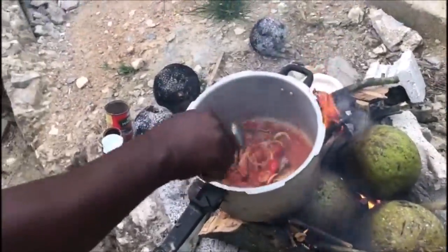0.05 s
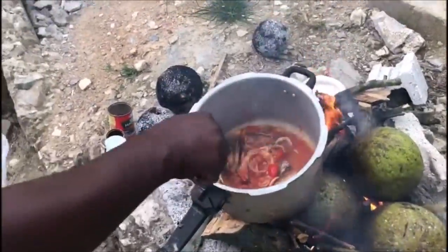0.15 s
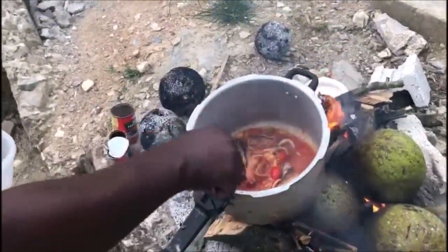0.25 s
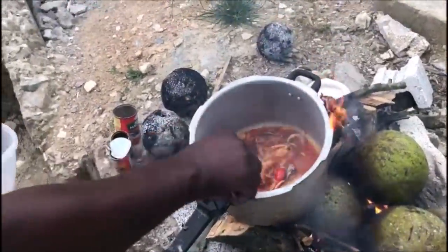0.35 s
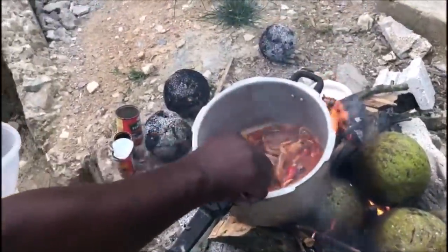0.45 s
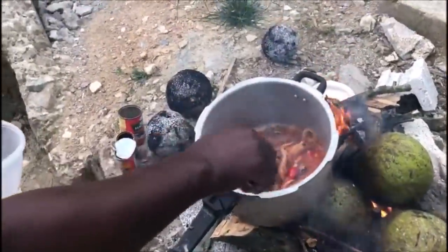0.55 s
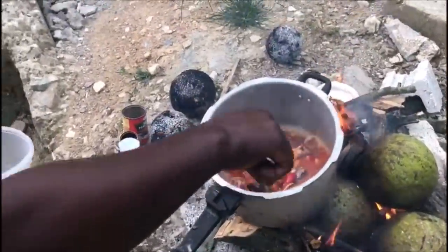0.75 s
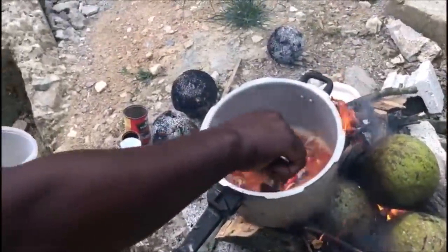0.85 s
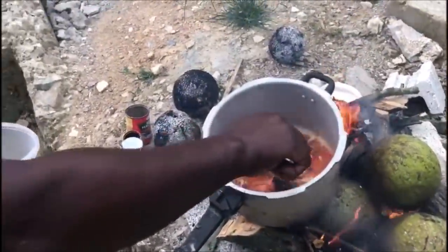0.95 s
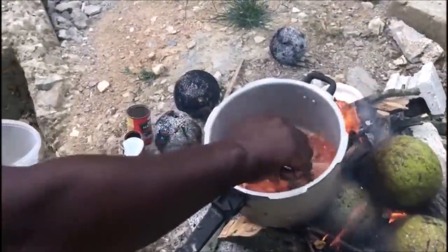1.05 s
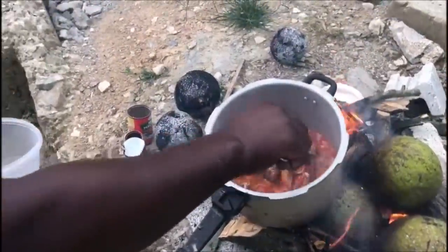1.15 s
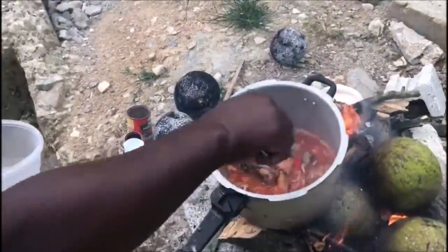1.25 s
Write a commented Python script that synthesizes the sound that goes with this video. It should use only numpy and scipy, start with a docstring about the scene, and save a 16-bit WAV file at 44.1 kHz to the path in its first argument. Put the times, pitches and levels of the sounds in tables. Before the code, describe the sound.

Close above an open pot outdoors, bubbling sauce fries with crisp, uneven hiss and tiny spitting ticks; one bright metallic spoon click comes early, a swell of sizzle follows, then a softer, duller knock.

```python
"""Tomato sauce sizzles in a deep metal pot over an outdoor wood fire while a spoon stirs it.
Random bubble bursts over hiss make the sizzle, and narrow noise bands make the air in the pot ring.
Larger drops spit with short ringing ticks. The spoon gives one sharp click on the wall and later a
duller knock through the sauce: decaying ringing tones plus a crack of noise.
The fire rumbles faintly below, as bass-heavy noise."""
import sys
import numpy as np
from scipy import signal
from scipy.fft import rfft, irfft
from scipy.io import wavfile

SR = 44100
rng = np.random.default_rng(int(sys.argv[2]) if len(sys.argv) > 2 else 0)


def unload_wav(signal):
    """Save mono or channel-first audio to the path in sys.argv[1] as 16-bit WAV at rate SR, clipped to [-1, 1]."""
    wavfile.write(
        sys.argv[1],
        SR,
        np.round(np.clip(np.atleast_2d(signal).T, -1, 1) * 32767).astype(np.int16),
    )


N = 57330
TIME = np.arange(N) / SR

# tones of the pot's bare wall: pitch_hz, level_db (used only for the spoon click), t60_s (time to fade 60 dB)
WALL_MODES = [(1026, -27, .05), (1465, -29, .055), (2140, -28, .03), (2833, -28, .06), (2973, -30, .09),
              (3336, -14, .045), (3574, -16, .028), (4005, -15, .022), (4500, -25, .04), (4850, -9, .021),
              (4990, -19, .028), (6097, -19, .04), (6390, -18, .026), (6830, -16, .024), (8445, -20, .028),
              (10520, -19, .018)]


def from_db(db):
    """Turn decibels into a gain."""
    return 10 ** (np.asarray(db) / 20)


def rms_one(x):
    """Scale a signal to an rms (average strength) of 1."""
    return x / np.sqrt(np.mean(x ** 2) + 1e-20)


def in_time(rows):
    """Make one curve over time per column, joining the points by straight lines."""
    seconds, *columns = np.transpose(rows)
    return [np.interp(TIME, seconds, column) for column in columns]


def colour(x, points):
    """Filter to a given spectrum, never sounding ahead of the input; white noise keeps its level."""
    size = 2 * N
    hz, db = np.transpose(points)
    log_bins = np.log(np.arange(N + 1) * SR / size + 1)
    gain = rms_one(from_db(np.interp(log_bins, np.log(hz), db)))
    # folding the cepstrum onto positive time gives the minimum-phase filter
    cepstrum = irfft(np.log(gain))
    response = np.exp(rfft(2 * cepstrum[:N], size) - cepstrum[0])
    return irfft(rfft(x, size) * response)[:N]


def ring(x, hz, t60):
    """Resonator: a unit click starts a decaying wave of height about 1, with little bass below it."""
    radius = np.exp(-np.log(1000) / (t60 * SR))
    angle = 2 * np.pi * hz / SR
    feedback = [1, -2 * radius * np.cos(angle), radius * radius]
    return signal.lfilter([.5, 0, -.5], feedback, x + 1e-18)


def impulses(rows):
    """Place single-sample clicks from rows of start_s, level_db."""
    clicks = np.zeros(N)
    for start_s, level_db in rows:
        clicks[int(start_s * SR)] = from_db(level_db)
    return clicks


def bursts(spectrum, per_s, spread_db, hiss_db, cycles):
    """Uneven bubbles burst at random and fade 60 dB in some cycles, over the hiss of countless small ones."""
    sizes = from_db(spread_db * np.minimum(rng.exponential(1, N), 4.5))
    signs = rng.choice([-1, 1], N)
    pops = sizes * signs * (rng.random(N) < per_s / SR)
    # each pop is dealt one pitch, higher pitches more often
    pitches = np.geomspace(900, 12000, 24)
    dealt = rng.choice(len(pitches), N, p=pitches / pitches.sum())
    grains = np.zeros(N)
    for k, hz in enumerate(pitches):
        grains += np.sqrt(hz) * ring(pops * (dealt == k), hz, cycles / hz)
    hiss = from_db(hiss_db) * rng.standard_normal(N)  # relative to the grains
    return rms_one(colour(rms_one(grains) + hiss, spectrum))


def pot_air(low_db):
    """Air resonances of the open pot: narrow noise bands that follow part of the simmer's level."""
    # pitch_hz, width_hz, level_db (before the trim below)
    air_bands = [(425, 35, -59), (480, 45, -58), (1015, 32, -57), (1610, 70, -62), (2110, 60, -61),
                 (3570, 130, -57)]
    trim_db, simmer_share = -1.5, 0.33
    air = np.zeros(N)
    for hz, width_hz, level_db in air_bands:
        t60 = np.log(1000) / (np.pi * width_hz)  # a narrower band rings longer
        air += from_db(level_db) * rms_one(ring(rng.standard_normal(N), hz, t60))
    return air * from_db(trim_db + simmer_share * (low_db - low_db.mean()))


def pot_wall(fine, fine_db):
    """The pot's metal wall rings faintly, all its tones driven by the fine sizzle."""
    ringing = rms_one(sum(ring(fine, hz, t60) for hz, _, t60 in WALL_MODES))
    return from_db(-58.5 + fine_db - fine_db.mean()) * ringing


def sauce():
    """Fine sizzle on hot metal, wet sputter and low simmer in the sauce, with the pot's wall and air."""
    # how hard the sauce fries as it is pushed over the hot metal, before the small trims below:
    # start_s, fine_sizzle_db, wet_sputter_db, low_simmer_db
    frying = [(0, -47, -51, -50.5), (.06, -44.5, -44, -54.5), (.17, -46, -45.5, -53.5),
              (.21, -46, -48, -52), (.29, -41.5, -46, -46), (.36, -42, -47, -50.5), (.44, -42, -48.5, -51),
              (.51, -51.5, -52, -52), (.55, -46.5, -55, -53), (.61, -43.5, -48, -52.5),
              (.7, -37, -46, -48.5), (.76, -40, -45.5, -48.5), (.83, -44, -48.5, -49.5),
              (.94, -43.5, -45.5, -50), (1.03, -46, -51.5, -48), (1.1, -45, -51, -49),
              (1.15, -48, -52, -53), (1.27, -44, -48.5, -51.5)]
    # colour of each layer: pitch_hz, density_db (per Hz)
    sizzle_colour = [(2000, -31), (4300, -19.5), (5400, 1), (6500, -0.5), (8000, 0.5), (10000, -1.5),
                     (11800, -3.5), (14000, -29)]
    sputter_colour = [(300, -32), (1500, -15.5), (2600, -4), (3600, 2.5), (4700, 3.5), (7000, -10.5),
                      (13000, -18)]
    simmer_colour = [(150, -6.5), (300, -5), (450, -5), (680, -4), (1000, 1), (1300, -3.5), (2200, 1.5),
                     (3200, -3.5), (6000, -18), (13000, -32)]
    sizzle_trim_db, sputter_trim_db = 0.5, 1.5
    treble_dip_share = 0.083  # the fine sizzle takes only this share of each dip in dB

    fine_db, wet_db, low_db = in_time(frying)
    dip_db = dips()
    fine = bursts(sizzle_colour, per_s=5700, spread_db=3.5, hiss_db=3, cycles=22)
    wet = bursts(sputter_colour, per_s=3900, spread_db=3, hiss_db=7, cycles=17)
    low = bursts(simmer_colour, per_s=2000, spread_db=2, hiss_db=0.5, cycles=13)
    sizzle = from_db(fine_db + sizzle_trim_db + treble_dip_share * dip_db) * fine
    sputter = from_db(wet_db + sputter_trim_db) * wet
    simmer = from_db(low_db) * low
    body = sputter + simmer + pot_wall(fine, fine_db) + pot_air(low_db)
    return sizzle + from_db(dip_db) * body


def spits():
    """Single larger drops burst, each a short ringing tick."""
    # start_s, peak_db, pitch_hz, t60_s
    drops = [(0.0178, -29, 4150, .005), (0.0304, -27, 4800, 0.0069), (.0855, -25, 9000, 0.0013),
             (0.2777, -27, 3630, 0.0044), (0.3508, -29, 8900, 0.013), (.556, -26.5, 6240, 0.0093),
             (0.5601, -23.5, 7600, 0.0031), (0.596, -17.5, 7200, 0.0023)]
    return sum(ring(impulses([(start_s, peak_db)]), hz, t60) for start_s, peak_db, hz, t60 in drops)


def fading_noise(start_s, hold_s, t60):
    """Noise that starts at the blow, holds briefly, then fades 60 dB in t60 seconds."""
    age = TIME - start_s
    fade = np.exp(-np.log(1000) * np.maximum(age - hold_s, 0) / t60)
    return (age > 0) * fade * rng.standard_normal(N)


def blow(contacts, modes, crack, crack_db, hold_s, crack_t60, tail_db, tail_t60, tail_hz):
    """Contacts ring the main modes; noise stands for the dense ones: a short crack and a duller tail."""
    build_s = .0015  # modes set in within this time, as the blow spreads through the pot
    lags = build_s * rng.random(len(modes))
    rings = np.zeros(N)
    for k, (hz, level_db, t60) in enumerate(modes):
        hits = impulses([(start_s + lags[k], force_db) for start_s, force_db in contacts])
        rings += (-1) ** k * from_db(level_db) * ring(hits, hz, t60)  # signs alternate
    first_s = contacts[0][0]
    short_crack = from_db(crack_db) * fading_noise(first_s, hold_s, crack_t60)
    lowpass = signal.butter(1, min(tail_hz, SR / 3), fs=SR, output="sos")
    tail = from_db(tail_db) * signal.sosfilt(lowpass, fading_noise(first_s, hold_s, tail_t60))
    return rings + colour(short_crack + tail, crack)


def spoon():
    """The spoon clicks brightly on the bare wall, then knocks dully on the bottom, under the sauce."""
    # each contact and its weaker second one: start_s, force_db (added to the mode levels)
    click_contacts = [(.2398, 0), (.2532, -19)]
    knock_contacts = [(.9836, 1), (1.0085, -12.5)]
    # tones of the bottom: pitch_hz, level_db (before the force), t60_s
    bottom_modes = [(224.5, -35, 0.081), (415, -30.5, .085), (478, -29.5, 0.044), (930, -36.5, 0.0098),
                    (1183, -34.5, 0.087), (1370, -42, 0.051), (1930, -26, 0.021), (2530, -28, 0.017)]
    # colour of each crack and its tail: pitch_hz, density_db (per Hz)
    click_colour = [(100, -32), (350, -26), (700, -1.5), (2300, -6.5), (3300, -3), (5500, -4), (6500, 13),
                    (8000, 7), (10000, 3), (12000, -6)]
    knock_colour = [(70, -52), (200, -0.5), (500, -5.5), (1200, 12), (2500, -4), (4000, 3), (5300, 3),
                    (6400, 4.5), (8000, -3.5), (12000, -5.5)]
    click = blow(click_contacts, WALL_MODES, click_colour, crack_db=-13.5, hold_s=0.0024,
                 crack_t60=0.015, tail_db=-19.5, tail_t60=0.061, tail_hz=6000)
    knock = blow(knock_contacts, bottom_modes, knock_colour, crack_db=-23, hold_s=0.0013,
                 crack_t60=0.038, tail_db=-35.5, tail_t60=0.19, tail_hz=2520)
    return click + knock


def fire():
    """Low rumble of the flames: bass-heavy noise whose level wanders."""
    # colour of the rumble: pitch_hz, density_db (per Hz)
    fire_colour = [(20, -27), (32, -31), (45, -14), (65, -11.5), (85, 0.5), (115, -8), (160, -8.5),
                   (230, -11), (330, -21), (600, -30.5), (4000, -69)]
    # loudness of the rumble, before the dips: start_s, level_db
    fire_level = [(0, -61.5), (.28, -56.5), (.4, -61), (.6, -59.5), (.68, -60), (.9, -65.5), (1.3, -64.5)]
    level_db, = in_time(fire_level)
    return from_db(level_db + dips()) * colour(rng.standard_normal(N), fire_colour)


def dips():
    """The level dips briefly, mostly below the treble: smooth bell-shaped drops, in dB."""
    # centre_s, half_width_s (where the drop is 1/e of its depth), depth_db
    drop_shapes = [(.142, 0.0069, 14), (0.324, 0.014, 26), (0.444, 0.0056, 10), (0.823, 0.0055, 6),
                   (0.954, 0.005, 5)]
    return -sum(depth_db * np.exp(-((TIME - centre_s) / half_width_s) ** 2)
                for centre_s, half_width_s, depth_db in drop_shapes)


def scene():
    """Add up sauce, spits, spoon and fire, as heard from just above the pot."""
    return (sauce() + spits() + spoon() + fire())[None]


def record(dry):
    """Cut the top steeply: 70 dB down from 12400 Hz upward."""
    return signal.sosfilt(signal.cheby2(20, 70, 12400, fs=SR, output="sos"), dry)


dry = scene()
out = record(dry)
unload_wav(out)
```